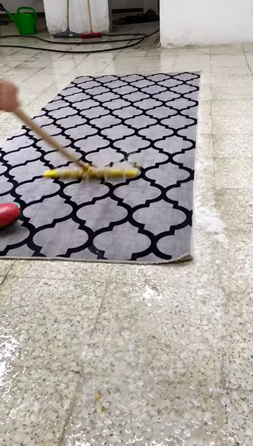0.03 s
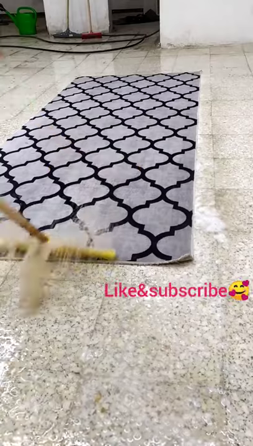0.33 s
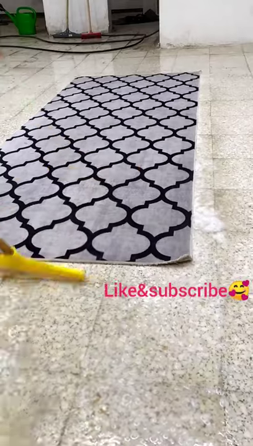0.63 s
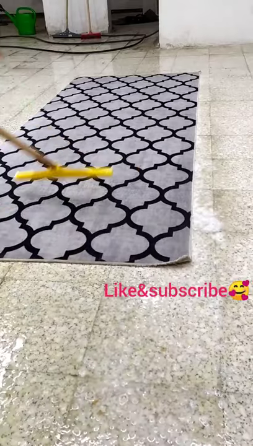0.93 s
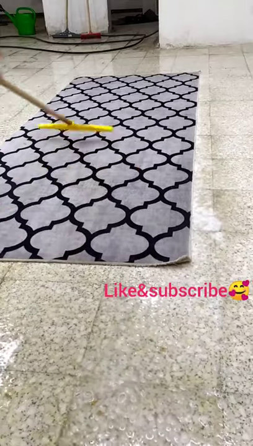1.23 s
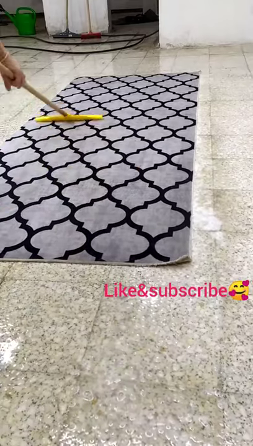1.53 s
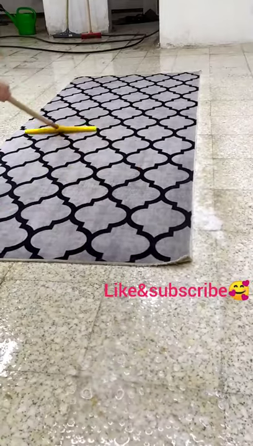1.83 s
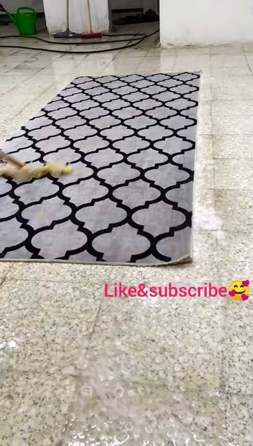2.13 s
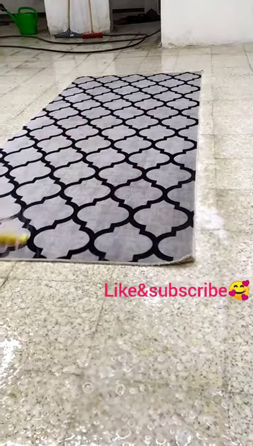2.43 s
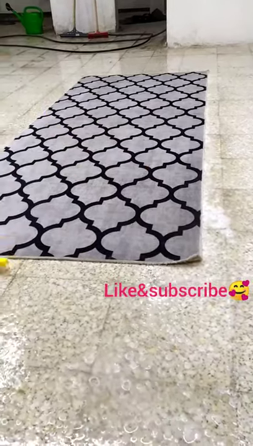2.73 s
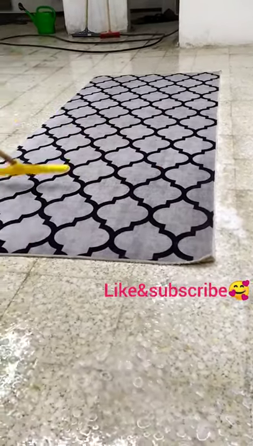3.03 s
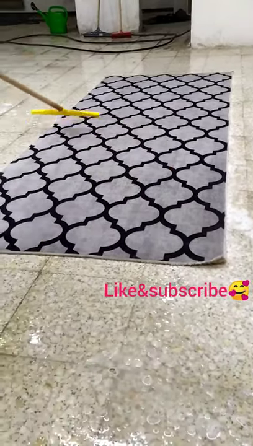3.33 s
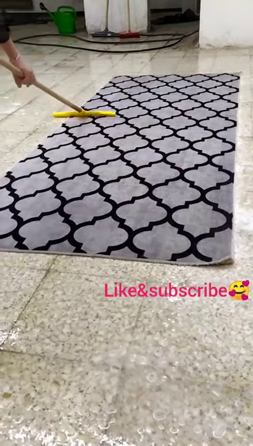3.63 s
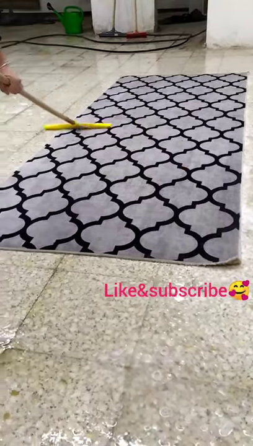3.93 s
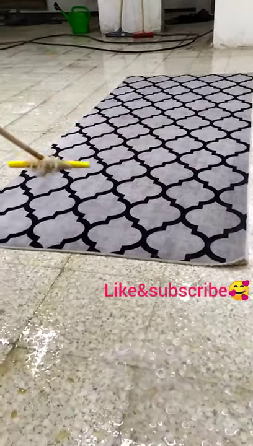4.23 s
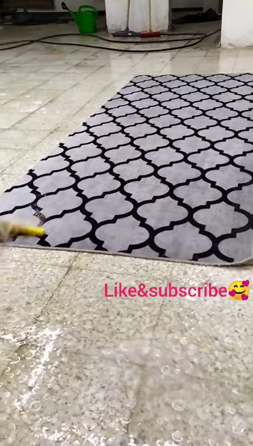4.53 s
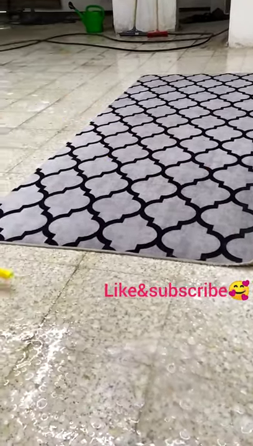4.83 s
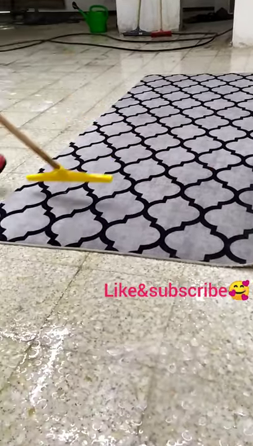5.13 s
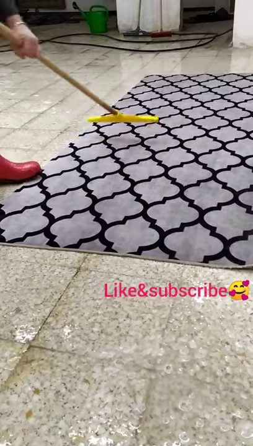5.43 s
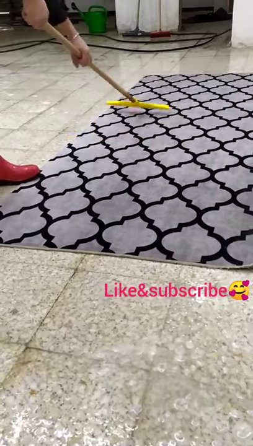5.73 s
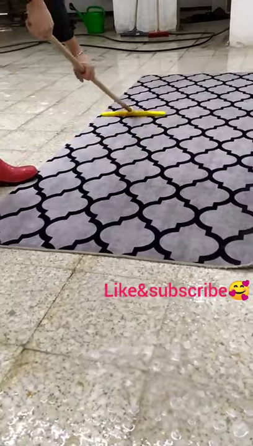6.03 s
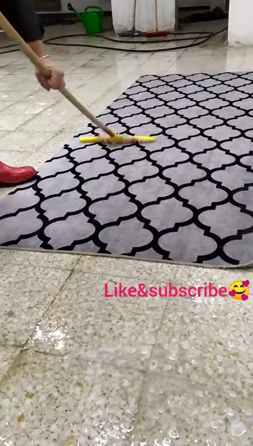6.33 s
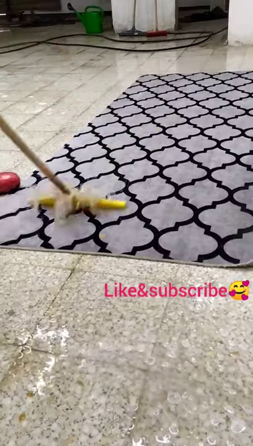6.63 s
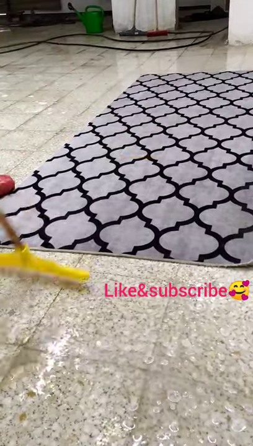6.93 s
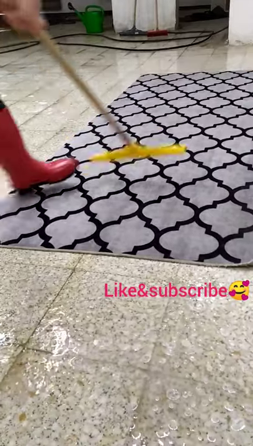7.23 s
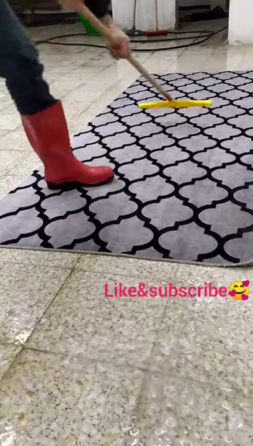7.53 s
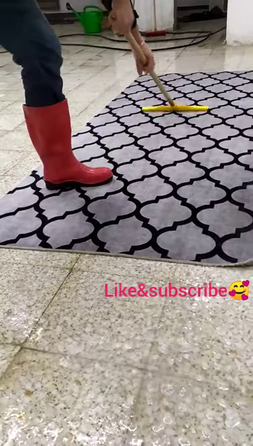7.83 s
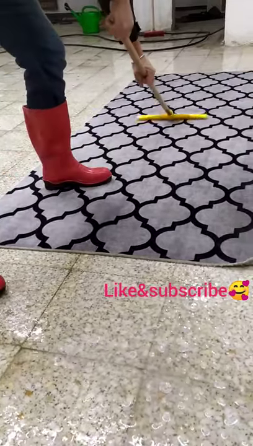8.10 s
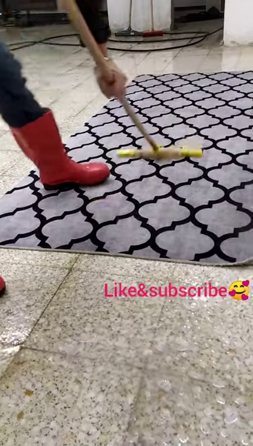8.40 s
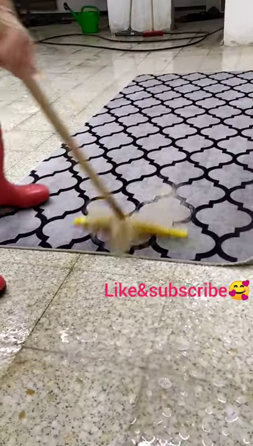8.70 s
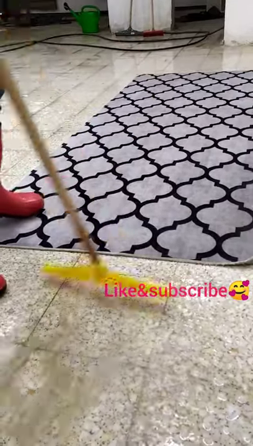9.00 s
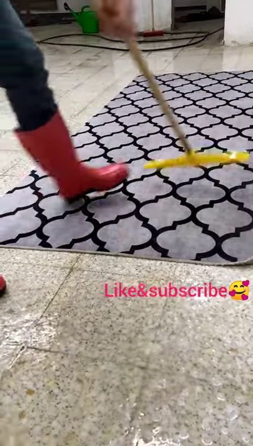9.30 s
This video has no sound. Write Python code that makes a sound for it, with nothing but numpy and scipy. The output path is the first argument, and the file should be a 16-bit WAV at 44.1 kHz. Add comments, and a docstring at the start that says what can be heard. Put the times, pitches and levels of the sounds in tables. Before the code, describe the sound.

A rubber squeegee is pulled over a soaked rug five times, about two seconds apart. Each pull is a wet hiss that swells and froths, then ends with water slapping and spattering on tiles. The blade squeaks briefly, judders on the last two pulls and skims softly back between strokes. The bare hall echoes, and a muffled engine drones beyond the walls, fading down. The microphone is fairly close, in stereo.

```python
"""A rubber squeegee is pulled five times over a soaked rug in a bare tiled hall.
Bursting water films make the pile hiss, louder as the blade speeds up; air pockets resonate in the
frothing wave ahead of it, and stick-slip friction makes the lip judder and squeak. After each pull the
water slaps on the tiles and spatters, and the hard walls reverberate. Beyond them an engine drones,
heard only through its low harmonics."""
import sys
import numpy as np
from scipy import signal
from scipy.fft import rfft, irfft, next_fast_len
from scipy.io import wavfile
from scipy.ndimage import uniform_filter1d, map_coordinates

SR = 44100
rng = np.random.default_rng(int(sys.argv[2]) if len(sys.argv) > 2 else 0)


def materialize(psi):
    """Save the field psi as 16-bit PCM at rate SR to the path in sys.argv[1].

    A 1-D psi becomes a single channel; in a 2-D psi each row is a channel.
    """
    bounded = np.clip(np.atleast_2d(psi).T, -1, 1)
    quanta = np.round(bounded * 32767).astype(np.int16)
    wavfile.write(sys.argv[1], SR, quanta)


N = 417186

# Pulls of the blade, levels relative within each column:
# start_s, length_s, hiss_db, crest_delay_s, crest_width_s, froth_db, slosh_db
BLADE_PULLS = [(-.6, 1.274, -42.5, 0.72, 0.26, -44.5, -50.5), (1.582, 1.23, -44, 0.7, 0.33, -44.5, -51.5),
               (3.718, 1.126, -42, 0.64, 0.31, -37, -45.5), (5.992, 1.013, -42.5, 0.59, 0.28, -41, -46.5),
               (7.985, 1.103, -41.5, 0.58, 0.3, -41.5, -49.5)]
# The blade skims back over the pile: time_s, width_s, level_db
BLADE_SKIMS = [(1.43, 0.19, -51.5), (3.48, 0.2, -54.5), (5.65, 0.42, -57), (7.75, 0.3, -54.5)]
# Spectra of the water in the rug: frequency_hz, density_db
PILE_SPECTRUM = [(200, -3.5), (850, -7), (1500, 5.5), (2600, 0.5), (4000, -2.5), (5600, -6), (8000, -1.3),
                 (11000, -7), (15500, -13)]
FROTH_SPECTRUM = [(500, -17.5), (950, -7.5), (1150, -6.5), (1310, 9), (1480, 1.5), (1680, -1.5), (2400, -7),
                  (3200, -17.5), (6000, -42)]
SLOSH_SPECTRUM = [(30, -32), (60, 2), (130, 4.5), (330, 3.5), (480, 0.5), (800, 6.5), (1100, -20),
                  (2000, -33)]
SEEP_SPECTRUM = [(500, -3), (1500, 0.5), (3000, -6.5), (5600, -4.5), (8000, -2.5), (11000, -6),
                 (15500, -10)]
# The lip judders on two hard pulls: peak_s, width_s, pitch_hz, relative_db
LIP_JUDDERS = [(6.6, 0.116, 151.7, -35.5), (8.59, 0.111, 142.6, -40.5)]
# The wet lip squeaks: time_s, pitch_hz, level_db
LIP_SQUEAKS = [(2.14, 1320, -45), (4.315, 1550, -35), (4.368, 1374, -33.5), (4.398, 1375, -35),
               (4.452, 1490, -38), (6.49, 1380, -40), (6.535, 1340, -40), (8.5, 1330, -45)]
# The wave breaks or runs out: time_s, width_s, pitch_ratio, level_db, fall_octaves_per_s
WAVE_GUSHES = [(.2, 0.089, 0.68, -56, 0.13), (.655, 0.14, 0.87, -46, 1.6), (4.2, 0.13, 1.23, -44.5, 0.045),
               (6.76, .07, 1.6, -48, 0.07), (7.06, 0.064, 0.87, -42, 1.2), (8.72, 0.11, 0.99, -43, 0.097)]
# Fine spray from under the lip: time_s, width_s, level_db
SPRAY_JETS = [(.185, 0.038, -47), (.31, 0.11, -50), (1.38, 0.26, -61), (2.37, 0.12, -46), (2.58, 0.11, -50),
              (5.17, 0.11, -61)]
# Sheets of water hit the tiles: start_s, slap_db, decay_s, crack_db, thud_db
SHEET_SLAPS = [(0.497, -22, 0.017, -25.5, -32), (0.521, -32, 0.021, -35, -50),
               (2.7229, -24, 0.035, -27.5, -45), (2.745, -31, 0.023, -33, -56),
               (4.697, -23.5, 0.026, -41, -46), (4.7071, -25, 0.028, -38, -54),
               (4.719, -21.5, 0.023, -30, -56), (4.7356, -6, 0.008, -19, -28),
               (4.749, -26, 0.034, -39, -35), (4.765, -28.5, 0.038, -36, -30.5),
               (4.785, -28.5, 0.039, -56, -37.5), (6.9198, -15, 0.011, -26, -51),
               (6.927, -12, 0.025, -30, -25.5), (6.932, -14, 0.021, -32, -26),
               (6.9443, -20, 0.012, -27, -36), (8.9163, -14, 0.025, -24, -28),
               (8.926, -19.5, 0.032, -29, -22), (8.941, -20.5, 0.034, -32, -33),
               (8.956, -17.5, 0.032, -36, -38), (8.976, -26, 0.043, -42, -43)]
# The shower after each throw: start_s, spatter_db, t60_s, splash_pitch_ratio, bubble_pitch_hz,
# pitch_spread_share, bubble_db, spray_db, push_re_thud_db
THROW_SHOWERS = [(.52, -49, 0.84, 0.81, 816, 0.2, -47, -42, -17),
                 (2.735, -42, 0.63, 1, 941, 0.14, -42, -41.5, -6),
                 (4.745, -30.5, 0.72, 1, 2040, 0.17, -41, -40, -5),
                 (6.945, -32.5, 0.62, 0.97, 1070, 0.24, -48, -53, -7),
                 (8.95, -30, 0.42, 0.94, 1017, 0.32, -38.5, -39, -12)]
# Big air pockets in the landing water: start_s, pitch_hz, relative_db
POCKET_GLUGS = [(.505, 952, -37), (.588, 724, -36), (.632, 526, -37), (.655, 775, -36), (.682, 880, -36),
                (.695, 478, -41.5), (2.724, 1040, -27.5), (2.745, 676, -46), (2.785, 995, -31),
                (2.84, 960, -28.5), (2.985, 996, -41), (4.785, 690, -30), (6.93, 950, -30),
                (7.04, 924, -26.5), (8.925, 652, -25.5), (8.956, 1353, -14), (8.99, 1284, -20)]
# The blade is set down or a boot shifts: start_s, level_db
RUG_THUMPS = [(1.615, -48), (3.917, -39.5), (5.49, -53), (6.132, -41), (7.908, -43), (8.13, -46)]
# Single drops: start_s, tick_db, bubble_pitch_hz, bubble_db
TILE_DRIPS = [(1.192, -48, 2420, -61), (5.023, -60, 2300, -51), (5.492, -48, 755, -44),
              (7.187, -51, 2210, -47), (7.303, -65, 2350, -44), (7.391, -52, 1916, -52)]
# Spectra of running water, spray and impacts: frequency_hz, density_db
GUSH_SPECTRUM = [(300, -11), (500, -7), (720, 1.5), (950, 6), (1300, -8), (1800, -0.5), (2600, -16),
                 (5000, -38), (12000, -32)]
MIST_SPECTRUM = [(2000, -40), (6000, -14), (8500, -4), (12000, 1), (13500, -4), (15500, -3)]
DROPLET_SPECTRUM = [(500, -10), (1500, 3), (4000, 0), (8000, -4), (11000, -13), (15500, -26)]
SPRAY_SPECTRUM = [(300, -36.5), (1000, 11.5), (2500, 2.5), (4000, -1), (5600, 0), (8000, -8),
                  (11000, -16.5), (15500, -20)]
SPLASH_SPECTRUM = [(50, -51), (160, -19), (300, -23.5), (480, -19.5), (750, -12), (1100, -6), (1400, 0.5),
                   (1800, 4.5), (2100, 1), (2500, 4), (2900, -2), (3400, -10.5), (4400, -17), (5600, -26),
                   (8500, -27), (15500, -36)]
CRACK_SPECTRUM = [(300, -26), (1000, -3.5), (2500, 3), (4400, 1), (5900, -5), (8000, -3.5), (11000, -8),
                  (15500, -14)]
GULP_SPECTRUM = [(50, -7), (100, 2), (170, 4.5), (270, 2), (370, 1), (480, -9.5), (700, -3.5), (1050, 6.5),
                 (1500, -19), (3000, -34)]
KNOCK_SPECTRUM = [(40, -17), (120, -2), (280, 7.5), (450, -8.5), (900, -30), (3000, -24), (12000, -59)]
# The engine's speed: time_s, firing_rate_hz
FIRING_RATE = [(.2, 88.57), (.4, 76.67), (.7, 72.1), (.96, 67.51), (1.08, 54.16), (1.3, 51.77),
               (1.46, 62.58), (5.4, 61.3), (7.3, 53.2), (9.46, 60.8)]
# Its fundamental while the speed hunts, then once settled: time_s, level_db
DRONE_HUNTING = [(0.0, -45), (0.034, -45), (0.07, -71), (0.092, -50), (0.15, -41), (0.288, -47),
                 (0.328, -36), (0.48, -30.5), (0.534, -41), (0.69, -32.5), (0.882, -46), (0.97, -33.5),
                 (1.006, -56), (1.056, -38), (1.282, -36), (1.314, -49), (1.35, -36), (1.6, -33.5)]
DRONE_SETTLED = [(2.15, -35), (2.8, -38), (3.8, -47.5), (4.9, -48), (5.7, -67), (6, -56.5), (9.46, -69)]
# Common gain of its overtones: time_s, gain_db
OVERTONE_GAIN = [(0, -44.5), (.9, -54), (1.45, -50.5), (1.7, -48.5), (2.6, -51), (3.7, -54.5), (5, -53),
                 (5.6, -64), (9.46, -56)]
# Weight of the overtones through the walls: frequency_hz, gain_db
EXHAUST_SPECTRUM = [(100, -10), (124, -1.5), (155, -8.5), (182, -9), (215, -19), (255, -10), (310, -17),
                    (380, -19), (500, -26)]
# The drone booms briefly on a higher note: time_s, width_s, pitch_hz, relative_db
DRONE_BOOMS = [(0.16, 0.12, 131.5, -49.5), (0.12, 0.11, 177, -70), (.05, .12, 262, -52),
               (1.68, 0.097, 185, -51.5), (1.88, 0.12, 245, -55), (2.17, 0.22, 124.6, -44),
               (3.3, 0.22, 140, -50)]
# Background noise of the hall: frequency_hz, density_db
AIR_SPECTRUM = [(15, -42), (25, -27), (43, -17.5), (64, -4.5), (96, -9), (305, -18.5), (378, -21),
                (445, -20.5), (648, -22.5), (782, -24.5), (1410, -25), (2120, -26), (2560, -29),
                (4870, -35.5), (15500, -72)]
# Reverberation time: frequency_hz, t60_s
HALL_DECAY = [(120, 1.5), (500, 1.87), (1500, 1.45), (2600, 1.33), (4000, 1.29), (8000, 0.92),
              (15000, 0.67)]
# Left-right likeness of the diffuse field: frequency_hz, coherence_ratio
COHERENCE = [(60, 0.96), (150, 0.97), (280, 0.94), (500, 0.52), (1000, 0.01), (3000, 0.0059),
             (12000, 0.017)]
# Colour of the two microphone ports: frequency_hz, left_minus_right_db
PORT_BALANCE = [(60, 1.6), (250, 2), (500, 1.5), (1100, 1), (2200, 4), (4000, 0.9), (7500, -2), (12000, -1)]


def squeegee():
    """Bursting films sum to a hiss in the pile; air pockets resonate in the wave ahead of the blade."""
    flow, froth, slosh = pull_envelopes()
    skim = sum(amp(db) * swell(s, width) for s, width, db in BLADE_SKIMS)
    grip_db, spurts_db = .7 * wobble(25), 2.5 * wobble(18)
    sputter = amp(-9.5 + spurts_db) * fizz(SPRAY_SPECTRUM, rate=600, scatter_db=1.6, wash=0)
    hiss = fizz(PILE_SPECTRUM, rate=2700, scatter_db=-0.5, wash=1.0)
    pile = patchy(hiss + amp(-14.5) * direct_fizz(PILE_SPECTRUM) + sputter, depth_db=2)
    trickle = patchy(fizz(SEEP_SPECTRUM, rate=3000, scatter_db=2.5, wash=1.4), depth_db=2.2)
    seep = np.hypot(amp(-62), skim) * trickle  # constant seepage and the skimming blade add in power
    pockets = np.array([bubbles(N, pitch_hz=1382, width=0.098, cycles=14, rise=0.0099, count=2200)
                        for ear in range(2)])
    surge_db = .8 * wobble(22) + 1.5 * wobble(140)
    foam = fizz(FROTH_SPECTRUM, rate=1800, scatter_db=2.5, wash=1.0) + 0.53 * diffuse(pockets)
    foam = wander(foam, share=0.032, rate=12)  # the pitch drifts as pockets grow and burst
    body = fizz(SLOSH_SPECTRUM, rate=330, scatter_db=-1.0, wash=0.82)
    wave = amp(surge_db) * (froth * amp(-1.5) * foam + slosh * amp(-2.0) * body)
    return flow * amp(5.0 + grip_db) * pile + seep + pan(wave, left_db=0.5)


def pull_envelopes():
    """Hiss follows a power law of blade speed; froth crests before slosh; all die as the blade lifts."""
    speed_exponent, lift_db_per_s, slosh_lag_s = 1.055, 156, 0.1
    t = np.arange(N) / SR
    flow, froth, slosh = np.zeros((3, N))
    for s, length, hiss_db, crest, width, froth_db, slosh_db in BLADE_PULLS:
        speed = np.clip((t - s) / length, 0, 1)
        contact = amp(-lift_db_per_s * np.maximum(t - s - length, 0))
        flow += amp(hiss_db) * speed ** speed_exponent * contact
        froth += amp(froth_db) * swell(s + crest, width) * contact
        slosh += amp(slosh_db) * swell(s + crest + slosh_lag_s, width) * contact
    return flow, froth, slosh


def judder():
    """Stick-slip oscillation: the lip cycles faster as it grips, and the head rocks at half its rate."""
    sag_share, rock_lag_s, rock_width_s = 0.087, 0.15, 0.17
    out = np.zeros(N)
    for s, width, hz, db in LIP_JUDDERS:
        grip = swell(s, width)
        phase = 2 * np.pi * np.cumsum(hz * (1 - sag_share * (1 - grip) + 0.0099 * wobble(50))) / SR
        rough_db = 3 * wobble(70)
        overtones = sum(np.sin(order * phase) / (order - 1) ** 2 for order in range(2, 6))
        lip = amp(rough_db / 2) * np.sin(phase) + amp(-15.5 + rough_db) * overtones
        head = amp(-44.5 + 4.0 * wobble(25)) * np.sin(phase / 2)
        out += amp(db + 1.0) * grip * lip + swell(s + rock_lag_s, rock_width_s) * head
    return out


def squeaks():
    """Friction of wet rubber excites brief tones, roughened by random phase modulation."""
    t = np.arange(N) / SR
    jitter = 1.1 * wobble(260)
    out = sum(amp(db) * swell(s, width_s=0.015) * np.sin(2 * np.pi * hz * t + jitter)
              for s, hz, db in LIP_SQUEAKS)
    return in_hall(out, left_db=4, wet_db=-4, walls_db=-8)


def throws():
    """Impact and bubble resonance: thrown water lands as flat slaps, then a decaying shower."""
    lead_s, same_throw_s = .1, .5
    t = np.arange(SR * 3 // 5) / SR
    out = np.zeros((2, N))
    push_age = t / 0.0009
    push = .9 * push_age * (2 - push_age) * np.exp(-push_age)  # the water's weight pushes the air once
    for s, spatter_db, t60, ratio, pitch_hz, width, bubble_db, spray_db, push_db in THROW_SHOWERS:
        start = s - lead_s
        water = np.zeros(2 * SR)
        splash = [(hz * ratio, level) for hz, level in SPLASH_SPECTRUM]
        for at, slap_db, decay_s, crack_db, thud_db in SHEET_SLAPS:
            if abs(at - s) < same_throw_s:
                gulp = burst(t, decay_s, GULP_SPECTRUM)  # a thick sheet traps big pockets of air
                thud = amp(thud_db) * (amp(push_db) * push + gulp)
                slap = amp(slap_db) * burst(t, decay_s, splash)
                crack = amp(crack_db) * burst(t, decay_s, CRACK_SPECTRUM)
                add(water, at - start, slap + crack + thud)
        for at, hz, glug_db in POCKET_GLUGS:
            if abs(at - s) < same_throw_s:
                add(water, at - start, amp(glug_db - 5.5) * glug(t, hz))
        drops = unit(colour(ticks(len(t), rate=900, scatter_db=1.7), splash))
        spray = unit(colour(ticks(len(t), rate=1200, scatter_db=6), SPRAY_SPECTRUM))
        pockets = bubbles(len(t), pitch_hz, width, cycles=8.9, rise=0.022, count=300)
        envelope = (1 - np.exp(-t / 0.005)) * amp(-60 * t / t60)
        shower = amp(spatter_db) * drops + amp(bubble_db) * pockets + amp(spray_db) * spray
        add(water, s - start, envelope * shower)
        add(out, start, in_hall(water, left_db=-0.5, wet_db=0, walls_db=1))
    return out


def glug(t, hz, cycles=10.8, rise=0.0179):
    """One big air pocket is a damped oscillator, gliding up as it decays by 1/e in the given cycles."""
    age = hz * t / cycles
    return np.exp(-age) * (1 - np.exp(-hz * t / 2)) * np.sin(2 * np.pi * hz * t * (1 + rise * age))


def bubbles(length, pitch_hz, width, cycles, rise, count):
    """Bubble resonance: a cloud of air pockets rings, each gliding up as it nears the surface."""
    draw = np.clip(rng.standard_normal((count, 2)), -2, 2)
    start = (rng.random((count, 1)) * length).astype(int)
    k = np.arange(SR // 55)
    turns = pitch_hz * np.exp(width * draw[:, :1]) * k / SR
    age = turns / cycles
    envelope = amp(2.7 * draw[:, 1:]) * np.exp(-age) * (1 - np.exp(-turns))
    ring = envelope * np.sin(2 * np.pi * turns * (1 + rise * age))
    return unit(np.bincount((start + k).ravel(), ring.ravel(), length)[:length])


def gushes():
    """Shot noise of water breaking over the blade or across the tiles, sinking in pitch as it spreads."""
    t = np.arange(SR // 2) / SR
    middle = t.mean()
    out = np.zeros((2, N))
    for s, width, ratio, db, fall in WAVE_GUSHES:
        spectrum = [(hz * ratio, level) for hz, level in GUSH_SPECTRUM]
        drops = colour(diffuse(ticks((2, SR), rate=1600, scatter_db=3)), spectrum)
        position = np.cumsum(2 ** (-fall * (t - middle)))
        rush = unit(np.array([map_coordinates(x, [position]) for x in drops]))
        add(out, s - middle, amp(db) * np.exp(-((t - middle) / width) ** 2) * rush)
    return out


def mist():
    """Tiny impacts radiate treble: spray jets from under the lip, and droplets tick where water moves."""
    spit_db, drain_db = -8, -64
    flow = pull_envelopes()[0]
    jets = sum(amp(db) * swell(s, width) for s, width, db in SPRAY_JETS)
    flicker = amp(1.2 * wobble(35))
    spray = patchy(fizz(MIST_SPECTRUM, rate=2500, scatter_db=2, wash=.5), depth_db=2.5)
    droplets = fizz(DROPLET_SPECTRUM, rate=130, scatter_db=1.6, wash=0)
    return jets * flicker * spray + (amp(spit_db) * flow + amp(drain_db)) * droplets


def thumps_and_drips():
    """Damped impacts: dull bumps on the rug, and drops that tick on the wet tiles and ring a bubble."""
    t = np.arange(SR // 8) / SR
    out = np.zeros(N)
    for s, db in RUG_THUMPS:
        add(out, s, amp(db) * burst(t, .06, KNOCK_SPECTRUM))
    for s, tick_db, hz, bubble_db in TILE_DRIPS:
        plink = amp(bubble_db - 60 * t / 0.049) * np.sin(2 * np.pi * hz * t * (1 + 2 * t))
        add(out, s, amp(tick_db) * burst(t, 0.061, SPRAY_SPECTRUM) + plink)
    return in_hall(out, left_db=0, wet_db=0, walls_db=-5)


def engine():
    """Walls act as a low-pass filter: only the lowest firing harmonics pass, each wavering in level."""
    waver_share, throb_db, beat_hz, beat_depth = .016, 1.4, 4.52, .34
    t = np.arange(N) / SR
    hz = curve(FIRING_RATE)
    drone_db = curve([*DRONE_HUNTING, *DRONE_SETTLED])
    phase = 2 * np.pi * np.cumsum(hz * (1 + waver_share * wobble(24))) / SR
    throb = lambda: throb_db * wobble(11)
    fading = lambda: 1.5 * wobble(3) + throb()
    overtones = sum(amp(along(EXHAUST_SPECTRUM, order * hz) + fading()) * np.sin(order * phase)
                    for order in range(2, 7))
    settled = np.interp(t, [DRONE_HUNTING[-2][0], DRONE_HUNTING[-1][0]], [0, 1])
    beat = 1 - beat_depth * settled * np.cos(2 * np.pi * beat_hz * t)
    booms = sum(amp(db + 3.0 + throb()) * swell(s, width) * np.sin(2 * np.pi * note * t)
                for s, width, note, db in DRONE_BOOMS)
    fundamental = amp(drone_db + throb()) * beat * np.sin(phase)
    return fundamental + amp(curve(OVERTONE_GAIN)) * overtones + booms


def still_air():
    """The hall's noise floor is a steady diffuse field, strongest in the bass."""
    return amp(-51.0) * unit(colour(diffuse(rng.standard_normal((2, N))), AIR_SPECTRUM))


def in_hall(x, left_db, wet_db, walls_db):
    """Direct sound superposes with early reflections from floor and walls, and with reverberation."""
    t = np.arange(SR // 25) / SR
    walls = diffuse(ticks((2, len(t)), rate=1500, scatter_db=0.36) * np.exp(-t / 0.035))
    early = signal.fftconvolve(x[None], walls / np.linalg.norm(walls[0]), axes=1)[:, :len(x)]
    return pan(x + amp(walls_db) * early, left_db) + amp(wet_db) * reverberation(x)


def reverberation(x):
    """Repeated reflection from hard walls leaves an exponential tail, the treble dying first."""
    hz, t, noise = signal.stft(rng.standard_normal((2, SR * 3 // 2)), SR, nperseg=256)
    envelope = amp(-60 * t / along(HALL_DECAY, hz)[:, None]) * (1 - np.exp(-t / 0.0014))
    tail = diffuse(signal.istft(noise * envelope, SR, nperseg=256)[1])
    return signal.fftconvolve(x[None], tail / np.linalg.norm(tail[0]), axes=1)[:, :len(x)]


def diffuse(pair):
    """Two unrelated signals become a diffuse field: coherent in the bass, independent in the treble."""
    m = next_fast_len(pair.shape[1])
    turn = np.arccos(np.clip(along(COHERENCE, np.fft.rfftfreq(m, 1 / SR)), -1, 1)) / 2
    mid, side = irfft(rfft(pair, m) * [np.cos(turn), np.sin(turn)], m)[:, :pair.shape[1]]
    return np.array([mid + side, mid - side])


def fizz(spectrum, rate, scatter_db, wash):
    """Shot noise of bursting water films over their own diffuse wash, rms 1."""
    grains = ticks((2, N), rate, scatter_db) + wash * rng.standard_normal((2, N))
    return unit(colour(diffuse(grains), spectrum))


def direct_fizz(spectrum, left_lag_s=0.000193):
    """Direct sound is coherent: the same fizz reaches both ports, the left a little later."""
    right = unit(colour(ticks(N, rate=12000, scatter_db=5.0), spectrum))
    delay = np.exp(-2j * np.pi * np.fft.rfftfreq(N, 1 / SR) * left_lag_s)
    return np.array([irfft(rfft(right) * delay, N), right])


def patchy(pair, depth_db):
    """Random patches of level over time and frequency make the hiss uneven and spattery; rms 1."""
    bands = signal.stft(pair, nperseg=512)[2]
    patches = uniform_filter1d(rng.standard_normal(bands.shape[1:]), size=3, axis=0)
    patches = uniform_filter1d(patches, size=9, axis=1)
    return unit(signal.istft(bands * amp(depth_db * unit(patches)), nperseg=512)[1][:, :N])


def wander(pair, share, rate):
    """Frequency modulation: all pitches of a sound drift up and down together by a share."""
    position = np.cumsum(1 + np.clip(share * wobble(rate), -.5, .5)) % (N - 1)
    return np.array([map_coordinates(x, [position]) for x in pair])


def burst(t, decay_s, spectrum):
    """An impact is a broadband transient: decaying noise, whitened and then coloured."""
    decay = amp(-60 * t / decay_s)
    landing = 1 - np.exp(-t / .0016)  # contact is not made everywhere at once
    puff = rng.standard_normal(len(t)) * decay * landing
    white = irfft(np.exp(1j * np.angle(rfft(puff))), len(t))
    return unit(colour(white * landing * np.exp(-t / decay_s), spectrum)) * np.sqrt(np.mean(decay ** 2))


def ticks(shape, rate, scatter_db):
    """A Poisson process of tiny impacts of uneven size, rate per second, rms 1."""
    size = amp(scatter_db * np.minimum(rng.exponential(size=shape), 4))
    return unit((rng.random(shape) < rate / SR) * size * np.sign(rng.standard_normal(shape)))


def colour(x, spectrum):
    """Minimum-phase filter through (frequency_hz, gain_db) points."""
    cepstrum = irfft(np.log(amp(along(spectrum, np.fft.rfftfreq(2048, 1 / SR)))))
    fold = np.r_[1, np.full(1023, 2), np.zeros(1024)]  # folding the cepstrum makes the filter causal
    kernel = irfft(np.exp(rfft(cepstrum * fold)))
    return signal.fftconvolve(x, kernel.reshape((1,) * (x.ndim - 1) + (-1,)), axes=-1)[..., :x.shape[-1]]


def swell(s, width_s):
    """Gaussian envelope, 1 at time s."""
    return np.exp(-((np.arange(N) / SR - s) / width_s) ** 2)


def wobble(rate):
    """Smooth random modulation, rate knots a second."""
    return map_coordinates(rng.standard_normal(int(N * rate / SR) + 4), [np.arange(N) * rate / SR])


def curve(points):
    """Linear interpolation of (time_s, value) points at every sample."""
    return np.interp(np.arange(N) / SR, *np.transpose(points))


def along(points, hz):
    """Interpolation of (frequency_hz, value) points on a logarithmic axis."""
    knots_hz, values = np.transpose(points)
    return np.interp(np.log(hz + 1), np.log(knots_hz + 1), values)


def pan(x, left_db):
    """A level difference between the channels leans a sound to one side."""
    return x * amp([[left_db / 2], [-left_db / 2]])


def add(track, s, sound):
    """Superpose a sound on a track at time s."""
    part = track[..., max(round(s * SR), 0):][..., :sound.shape[-1]]
    part += sound[..., :part.shape[-1]]


def amp(db):
    """Decibels to amplitude ratio."""
    return 10 ** (np.asarray(db) / 20)


def unit(x):
    """Normalise to rms 1."""
    return x / np.sqrt(np.mean(x ** 2) + 1e-20)


def scene():
    """Linear superposition: the pressures of all sources add."""
    blade = squeegee() + gushes() + mist() + squeaks() + judder()
    return blade + throws() + thumps_and_drips() + engine() + still_air()


def record(dry, top_hz=15850):
    """Each microphone port has its own frequency response, cut off at the band limit."""
    m = next_fast_len(N + SR // 2)
    hz = np.fft.rfftfreq(m, 1 / SR)
    ports = amp(along(PORT_BALANCE, hz) * np.array([[.5], [-.5]]))
    return irfft(rfft(dry, m) * ports * (hz < top_hz), m)[:, :N]


dry = scene()
out = record(dry)
materialize(out)
```